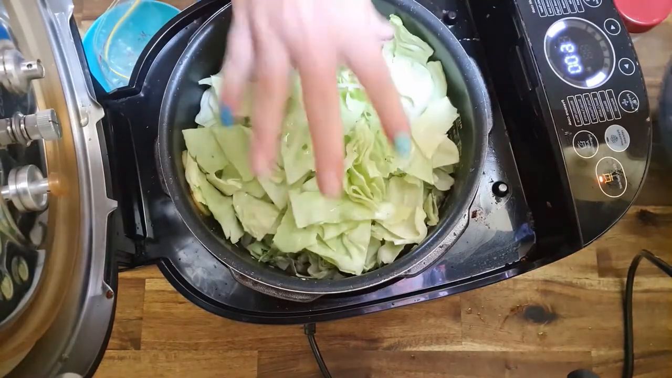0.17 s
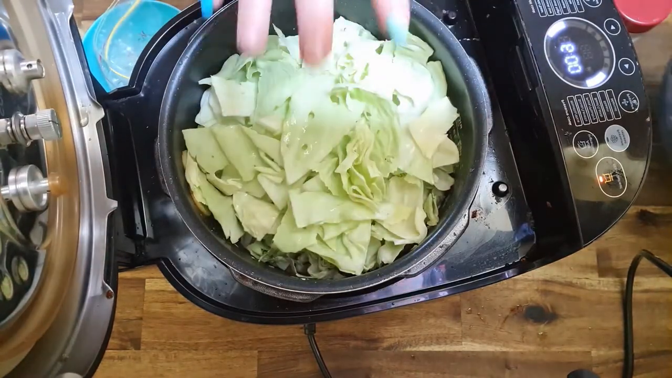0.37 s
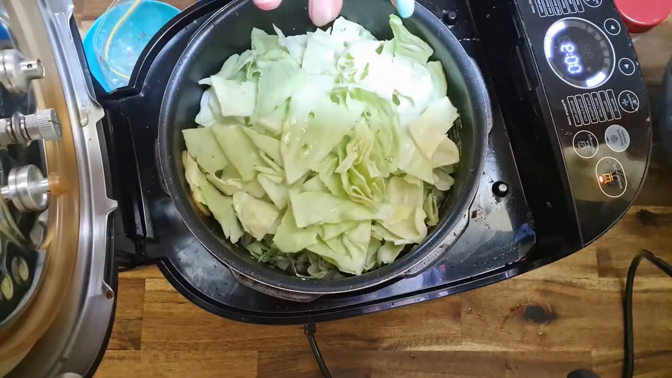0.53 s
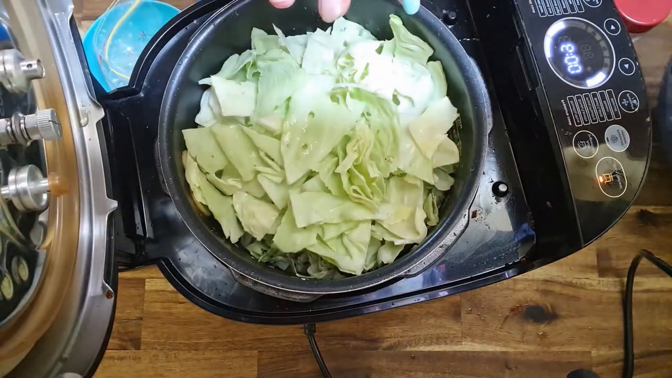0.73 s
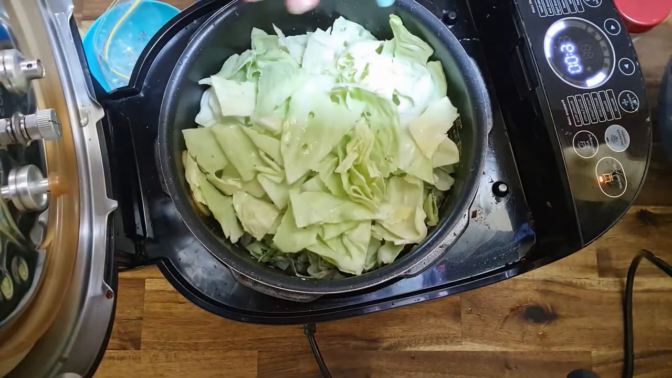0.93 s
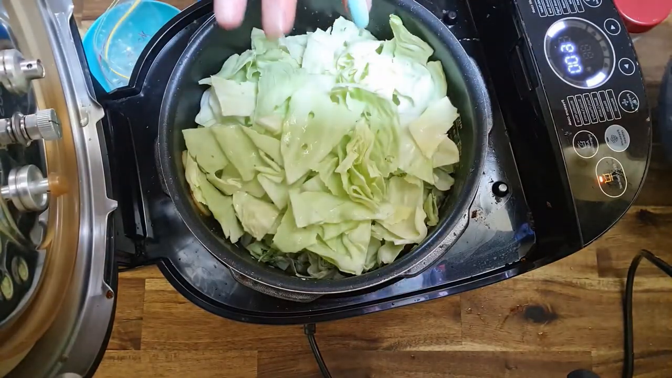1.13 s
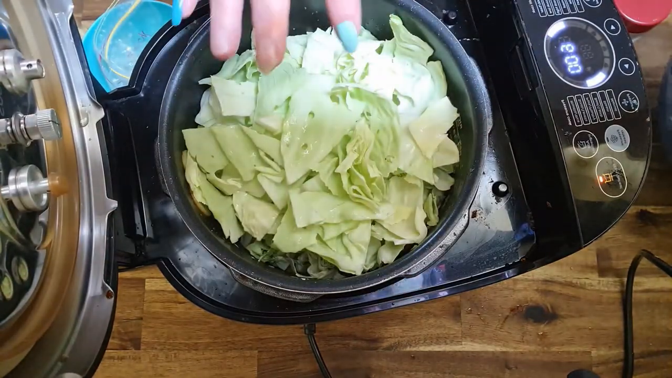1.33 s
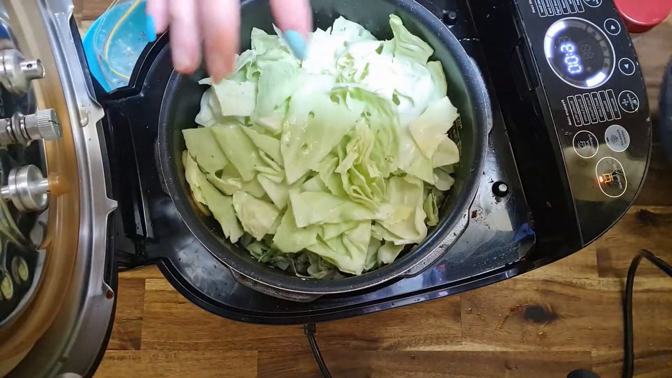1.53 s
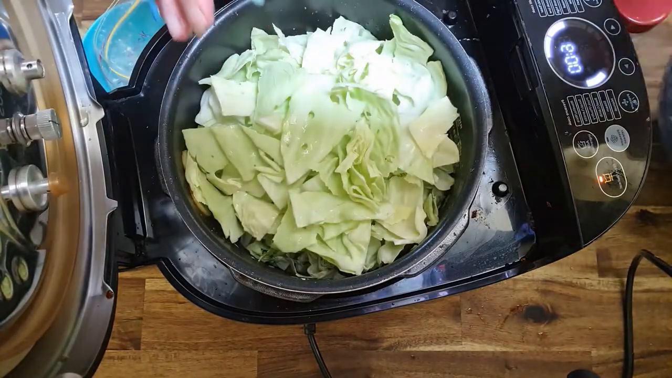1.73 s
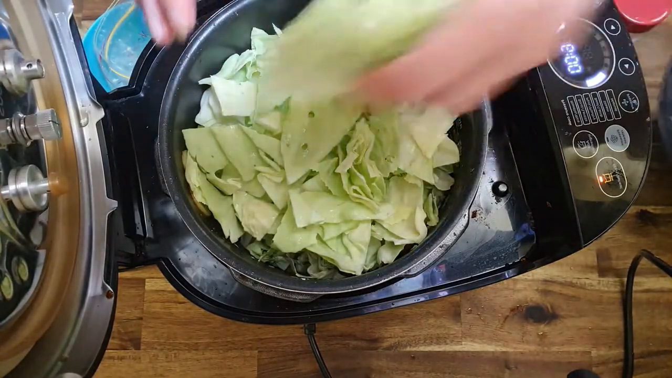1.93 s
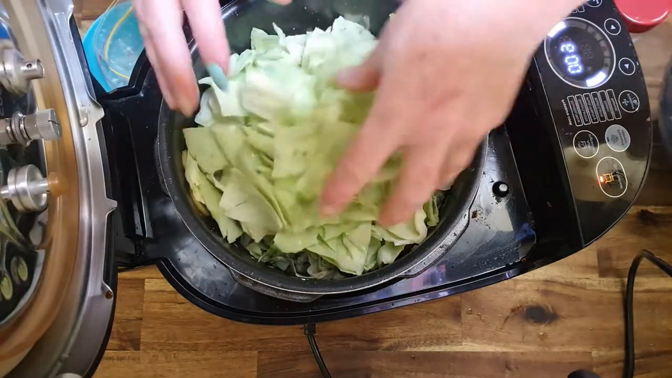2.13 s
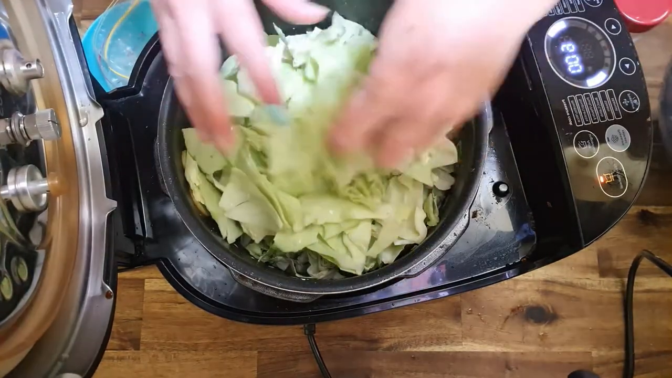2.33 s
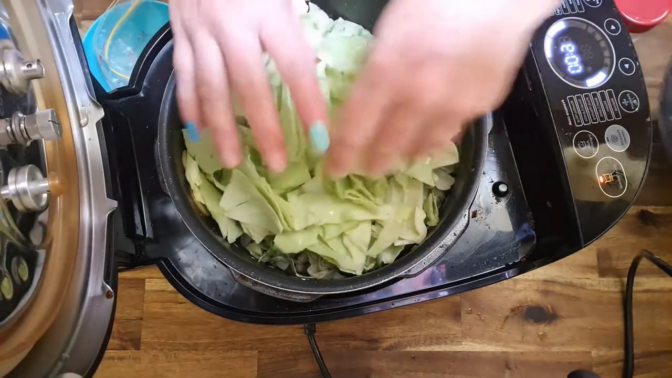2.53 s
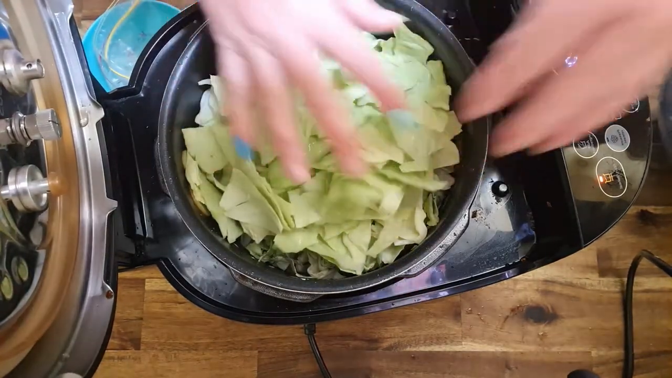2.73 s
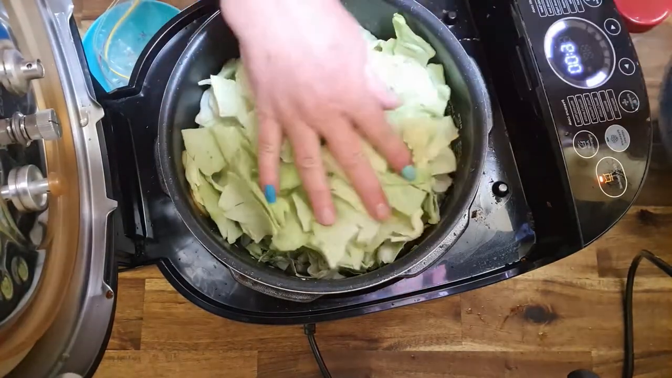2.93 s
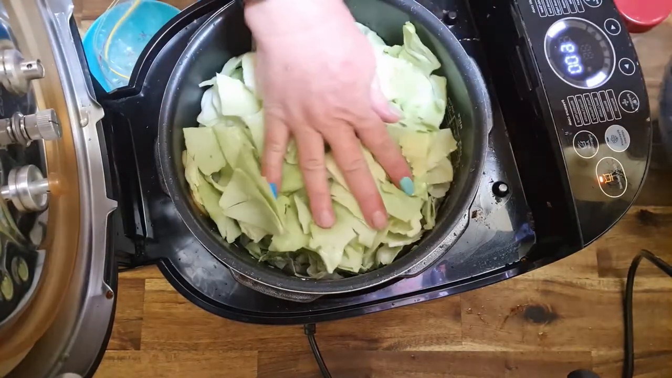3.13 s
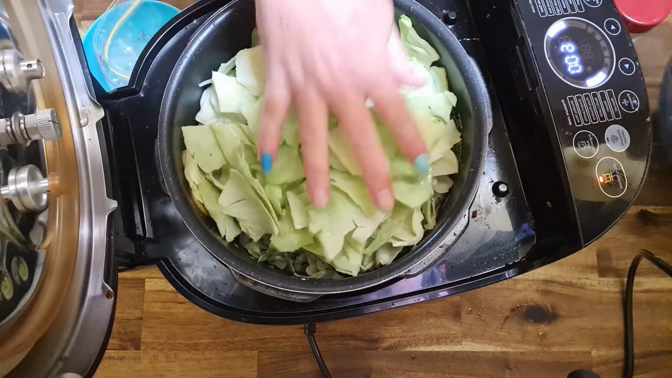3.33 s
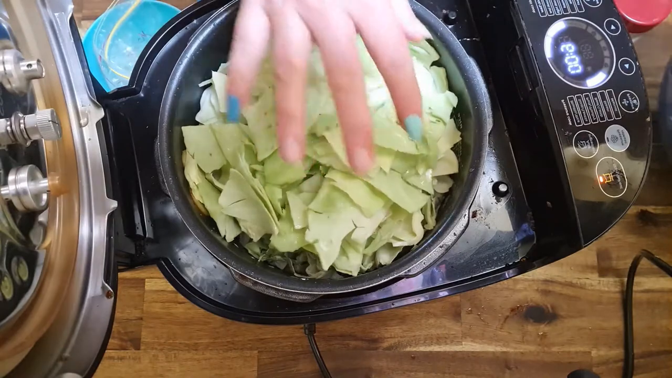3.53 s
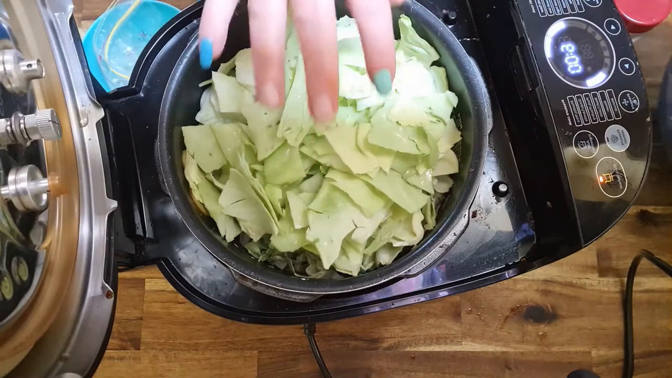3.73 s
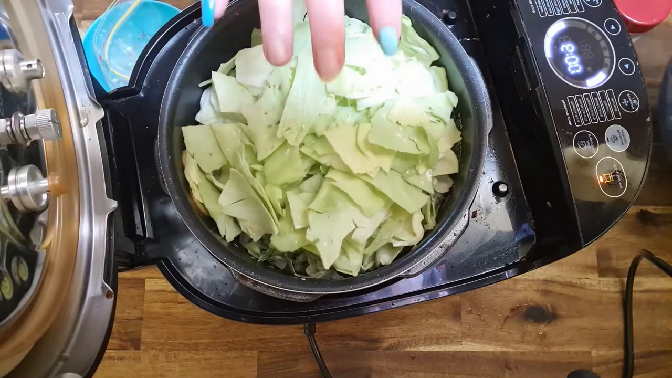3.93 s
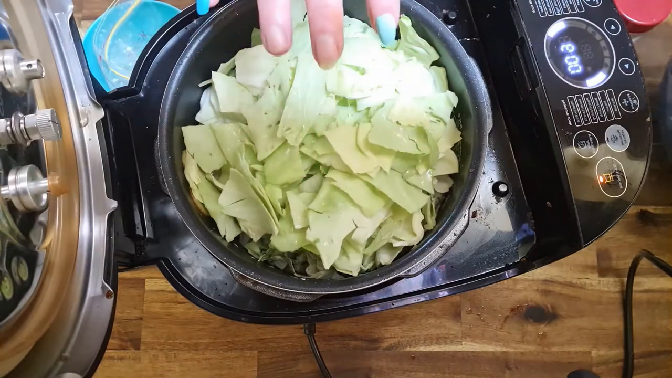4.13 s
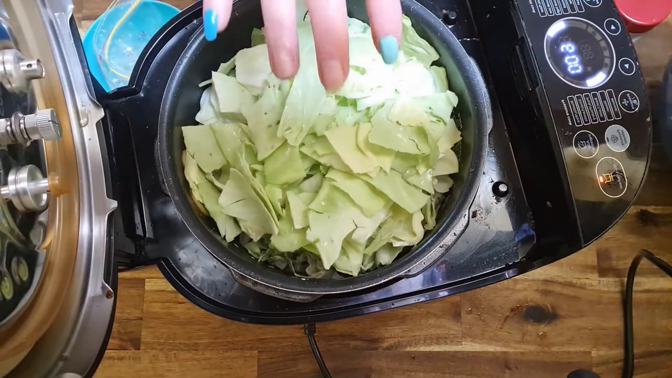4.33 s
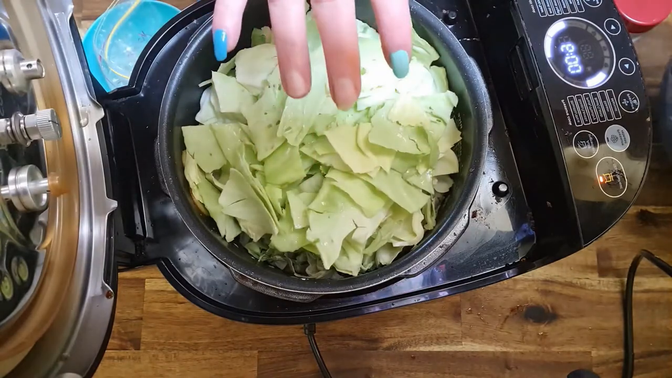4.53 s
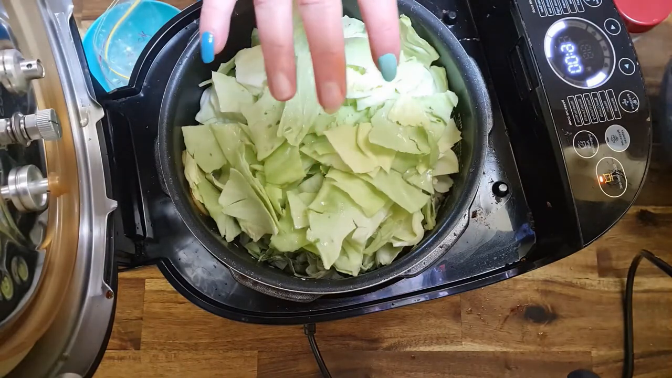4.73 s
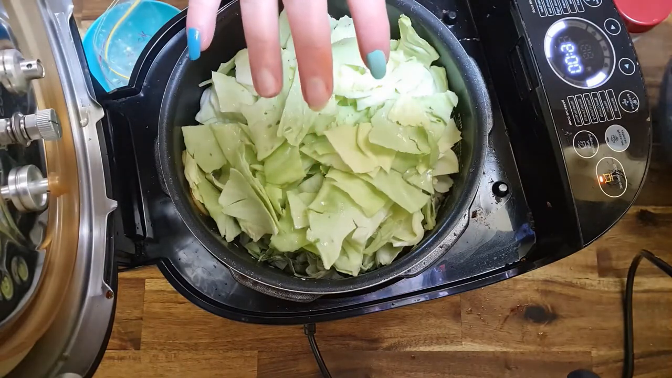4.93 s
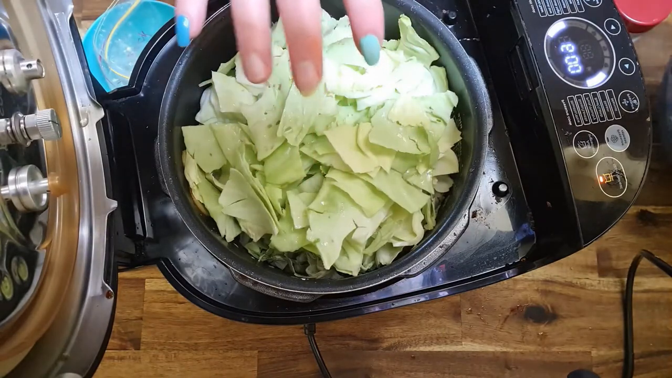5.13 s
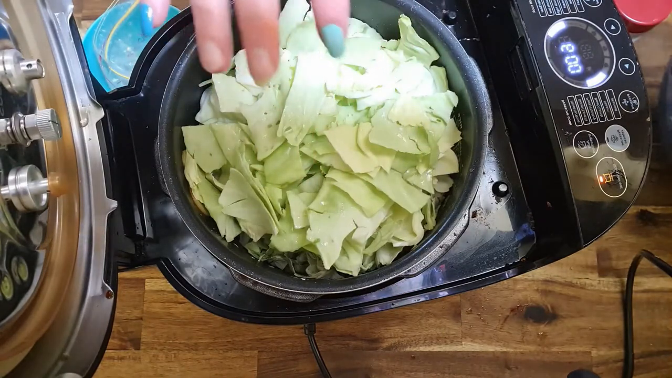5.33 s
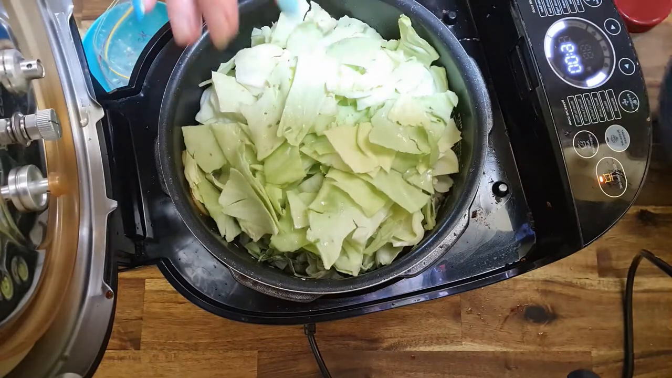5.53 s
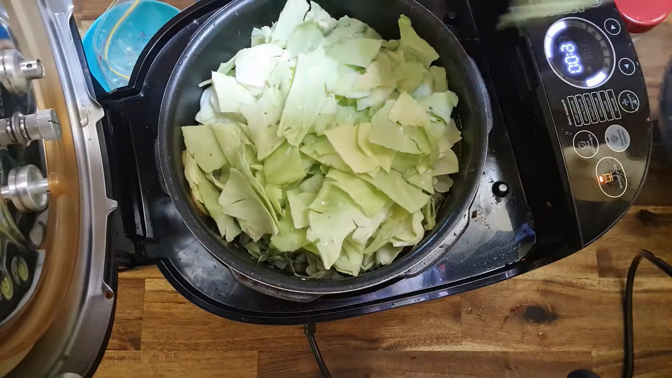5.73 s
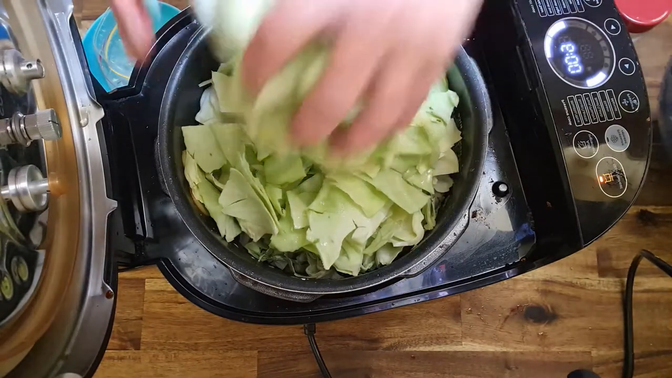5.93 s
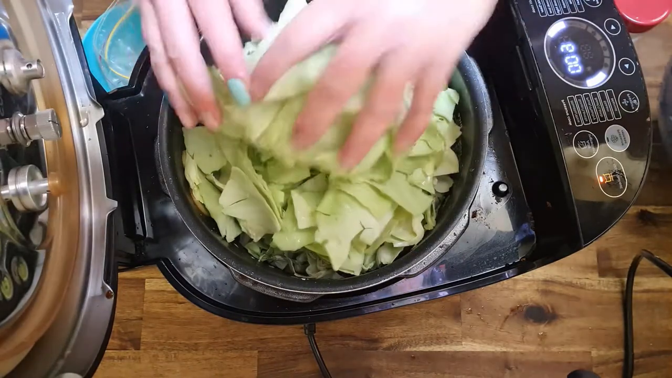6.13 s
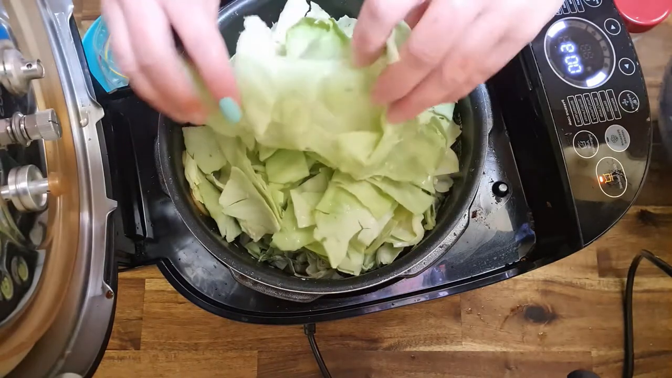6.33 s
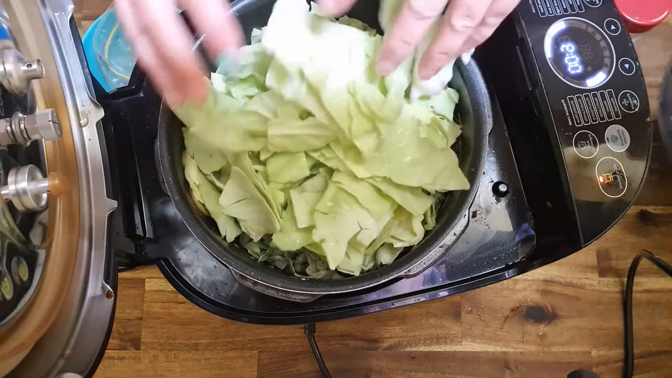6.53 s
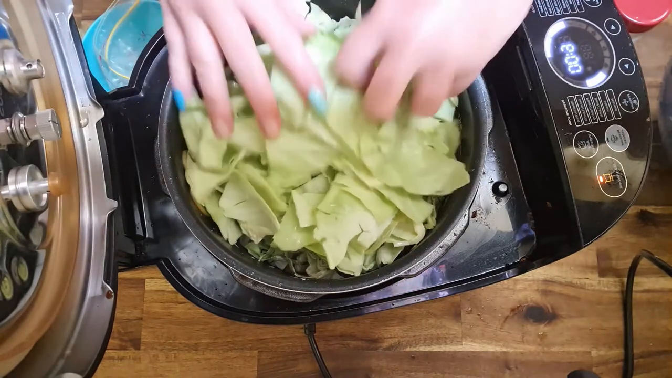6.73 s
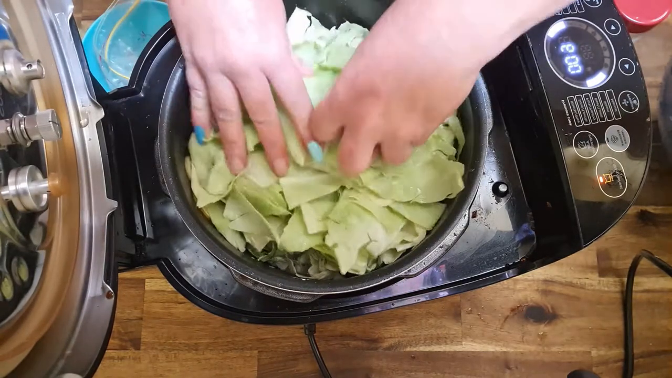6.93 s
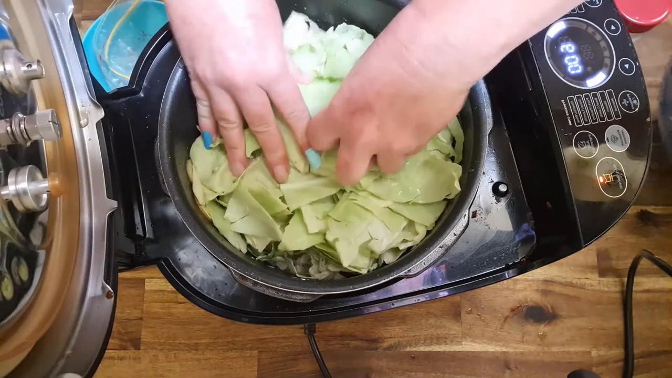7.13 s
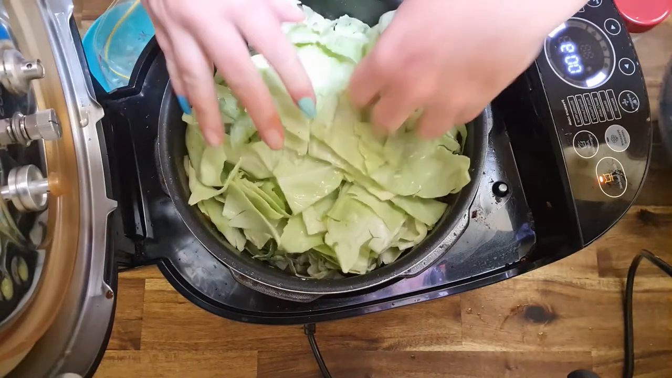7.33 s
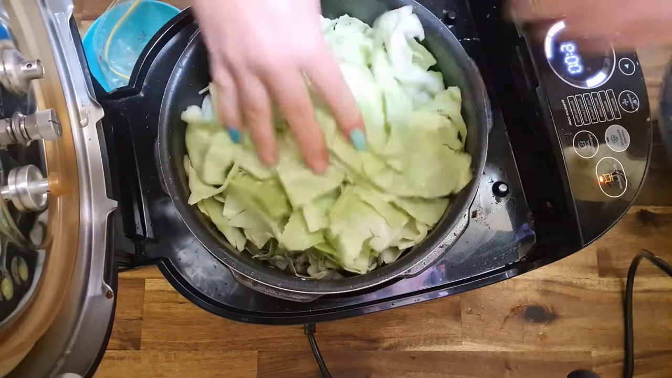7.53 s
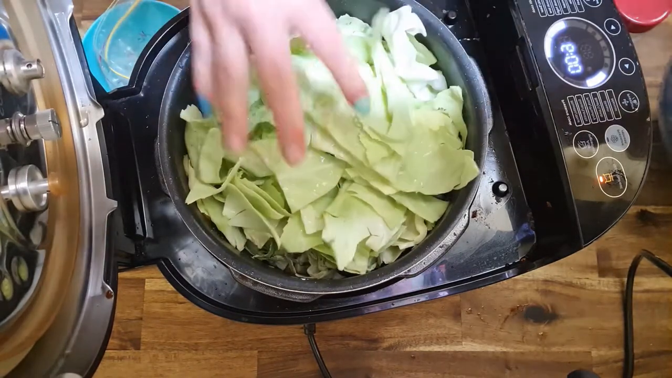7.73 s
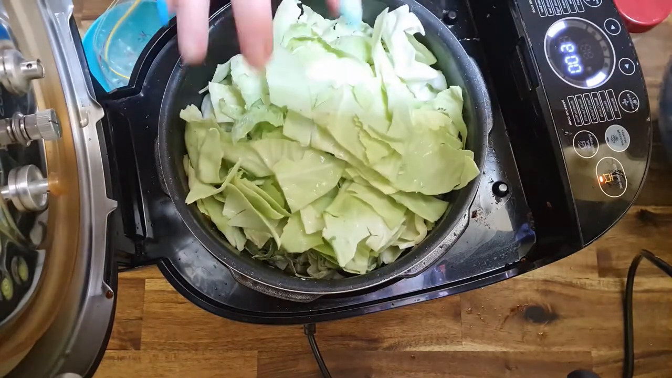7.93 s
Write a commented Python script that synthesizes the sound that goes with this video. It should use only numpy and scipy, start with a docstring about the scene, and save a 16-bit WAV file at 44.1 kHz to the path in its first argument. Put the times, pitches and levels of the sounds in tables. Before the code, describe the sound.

Crunchy raw cabbage leaves crackle, squeak and snap in bursts as hands pack them into a pot, with quiet pauses and low room noise.

```python
"""A small kitchen, microphones close to a cooker pot: two hands spread and press down chopped raw cabbage.
Leaf edges catch and slip in swarms of tiny ringing cracks, and the squeezed pile crunches duller below.
Stiff ribs snap and tear as short bursts; soft thuds are swelling bands of noise; a few leaves squeak.
Leaves also slide on a cutting board, as a hiss of fine cracks. Pot, hollows and kitchen answer with
resonances and a short reverberation, over low room noise and hum made of shaped noise."""
import sys
import numpy as np
from scipy import signal
from scipy.fft import rfft, irfft
from scipy.io import wavfile
from scipy.ndimage import uniform_filter1d

SR = 44100
rng = np.random.default_rng(int(sys.argv[2]) if len(sys.argv) > 2 else 0)


def transcribe(signal):
    """Save signal, clipped to [-1, 1], as a 16-bit WAV file at the path in sys.argv[1]."""
    frames = np.atleast_2d(signal).T
    limited = np.clip(frames, -1, 1)
    pcm = np.round(limited * 32767).astype(np.int16)
    wavfile.write(sys.argv[1], SR, pcm)


N = 351477
TIME = np.arange(N) / SR

# Levels of sources are given ahead of the trims in their functions and of the pot and kitchen.
# strokes of the hands through the pile: peak_s, build_up_s, let_go_s, crackle_level_db,
# crunch_db (relative to crackle), left_over_right_db
HAND_STROKES = [(0.174, 0.033, 0.034, -65, -3, 0), (0.29, 0.071, 0.063, -60, -5.5, -3.5),
                (0.382, 0.051, 0.056, -40, -8, -1.5), (0.622, 0.024, 0.18, -34, -17.5, 0),
                (0.712, 0.14, 0.064, -37.5, -11, -3), (0.824, 0.047, 0.03, -40, -12, -3),
                (0.956, 0.14, 0.041, -54, -8.5, -5), (1.148, 0.011, 0.018, -63.5, -10, -4),
                (1.226, 0.019, 0.02, -64.5, -8, -2), (1.979, 0.049, 0.023, -46.5, -12.5, 1),
                (2.055, 0.042, 0.041, -48, -5.5, 1.5), (2.333, 0.048, 0.024, -38, -11, 2),
                (2.43, 0.158, 0.03, -47, -15, 2.0), (2.473, 0.0084, 0.032, -49.5, -15, 0),
                (2.858, 0.022, 0.15, -49.5, -6, 1.0), (3.001, 0.071, 0.031, -40.5, -8.5, 1.0),
                (3.187, 0.11, 0.034, -51.5, -8.5, 1), (3.331, 0.037, 0.009, -49.5, -7.5, -1.5),
                (3.398, 0.037, 0.2, -50.5, -6.5, -1.5), (3.562, 0.012, 0.13, -45.5, -8.5, -1.5),
                (3.71, 0.019, 0.065, -45, -10.0, -2.5), (3.829, 0.16, 0.064, -43, -8.5, -1),
                (3.999, 0.107, 0.151, -41.5, -10.5, -2.5), (4.101, 0.16, 0.023, -38, -17.5, -1),
                (4.213, 0.023, 0.029, -39.5, -19, -1), (4.41, 0.19, 0.061, -51, -9, -1),
                (4.543, 0.021, 0.026, -50, -8.5, -3.5), (4.947, 0.01, 0.0077, -47, -17, -2),
                (5.954, 0.035, 0.018, -41.5, -19, 1), (5.98, 0.1, 0.071, -47.5, -3, 1.0),
                (6.14, 0.021, 0.084, -59, -6.5, 1.0), (6.278, 0.106, 0.016, -55, -2.5, 0),
                (6.358, 0.014, 0.01, -41.5, -29, 1), (6.38, 0.155, 0.16, -64, 2, 2),
                (6.645, 0.019, 0.11, -44.0, -12, 1.0), (6.782, 0.082, 0.094, -39.5, -6.5, 1),
                (6.976, 0.037, 0.034, -26.0, -7.5, 1.0), (7.17, 0.03, 0.045, -35, -11.5, 1.5),
                (7.242, 0.023, 0.082, -52.5, -6, -0.5), (7.508, 0.013, 0.028, -50, -24, 8),
                (7.545, 0.033, 0.017, -42.5, -7.5, -1), (7.604, 0.0284, 0.062, -60, -1.5, 0.5)]
# a stroke lies FLANK_DB under its peak one build-up before and one let-go after; ROUNDNESS 1 = pointed, 2 = bell
FLANK_DB, ROUNDNESS = -10.0, 1.37
# after each stroke the leaves spring back and creak to rest, from this level under the peak
SETTLE_DB, SETTLE_DB_PER_S = -20, 106.5
# filter of the crackling leaf edges: frequency_hz, gain_db
EDGE_COLOUR = [(600, -47), (1500, -4.5), (2200, -11), (2700, -3.5), (3600, -2), (4600, -2), (6300, -5),
               (8000, -9.5), (10000, -12.5), (13000, -10.5), (16000, -18)]
# filter of the duller cracks deep in the pile: frequency_hz, gain_db
PILE_COLOUR = [(100, -32), (300, 3), (600, -5), (900, -2), (1300, 1.5), (1750, 5), (2150, -2.5),
               (3000, 0.5), (6000, -14.5)]
# the loudest ribs snapping: crack_s, peak_level_db, pitch_hz
RIB_SNAPS = [(0.347, -31.5, 3170), (0.3735, -24, 3170), (0.3846, -24.5, 3670), (0.5142, -36, 3280),
             (0.5606, -30.5, 3800), (0.7015, -16, 1740), (0.8303, -24, 3750), (0.878, -31.5, 3650),
             (0.9564, -30.5, 6260), (1.038, -36.5, 6590), (2.3915, -33.5, 4260), (2.471, -33, 4160),
             (2.9255, -30, 4040), (3.0028, -25, 4060), (3.3209, -31, 3520), (3.4196, -32, 4300),
             (3.5669, -28, 1790), (3.6757, -28.5, 3580), (3.915, -24, 3480), (3.9893, -25.5, 3470),
             (4.2004, -23.5, 7100), (4.36, -34.5, 6000), (4.5504, -36, 5830), (4.9418, -34.5, 6300),
             (5.8421, -39, 5500), (6.0477, -35.5, 2830), (6.3555, -26.5, 2770), (6.4479, -41.5, 3170),
             (6.5444, -46.5, 3100), (6.6489, -30, 6100), (6.683, -28, 4700), (6.8055, -22.5, 7160),
             (6.8344, -22.5, 6200), (6.934, -18, 5960), (6.9421, -18.5, 4460), (6.9672, -11.5, 4410),
             (7.3107, -41.5, 4200), (7.5457, -25.5, 3120)]
# filter of the snapping ribs: frequency_hz, gain_db
RIB_COLOUR = [(300, -1.5), (1500, -8), (2100, -3.5), (2800, 4.5), (6000, 2), (9000, -3.5), (15000, -4.5)]
# pushes that reach the pot: centre_s, peak_level_db, pitch_hz, length_s (centre to 1/e of the swell)
POT_PUSHES = [(0.371, -48, 406, 0.012), (0.648, -49, 122, 0.04), (2.053, -58.5, 303, 0.11),
              (2.994, -48.5, 590, 0.028), (3.328, -50, 108, 0.016), (3.618, -56.5, 131, 0.16),
              (4.06, -50.5, 314, 0.022), (4.444, -48.5, 490, 0.0098), (5.698, -52, 275, 0.035),
              (5.72, -53, 70, .039), (5.968, -42, 285, 0.01), (5.991, -45, 88, 0.02),
              (6.964, -55.5, 80, 0.11), (6.99, -42, 295, 0.019), (7.55, -54.5, 480, .016),
              (7.772, -57, 785, 0.0065)]
# waxy leaves squeaking on each other: centre_s, peak_level_db, pitch_hz, length_s (centre to 1/e)
LEAF_SQUEAKS = [(1.725, -69, 2270, 0.0064), (1.95, -54, 6040, 0.0048), (2.2, -68, 3200, 0.011),
                (3.797, -46, 3210, 0.0057), (3.821, -43, 2820, 0.0057), (4.229, -52, 3470, 0.0056),
                (6.944, -32.5, 4560, 0.0063), (7.601, -55, 2670, 0.0062)]
# leaves pushed across the cutting board: fastest_s, length_s (centre to 1/e), level_db
BOARD_SLIDES = [(5.38, 0.086, -74.5), (5.73, 0.073, -49.5)]
# filter of the hiss on the board: frequency_hz, gain_db
SLIDE_COLOUR = [(500, 0), (1800, -8), (3200, -4.5), (4000, -7), (5000, 1.5), (5800, -7.5), (7000, -8),
                (8500, -15), (15000, -13)]
# hollows between the leaves that ring while a hand holds them in shape; the short row at 777 Hz is instead the
# pot's low mode ringing harder during the hardest press: start_s, end_s, pitch_hz, gain_db
LEAF_HOLLOWS = [(0.342, 0.432, 587, 12), (0.638, 0.79, 1800, 4), (2.277, 2.517, 4740, -7),
                (2.88, 3.194, 1350, 1), (3.396, 4.152, 1750, -2.5), (3.74, 3.87, 3260, 4.5),
                (3.893, 4.255, 3520, -2.5), (5.916, 6.3, 4730, 0), (6.11, 6.3, 2900, 3),
                (6.91, 7.216, 1170, 1), (6.953, 7.03, 777, 5.5), (7.122, 7.276, 4330, -3),
                (7.522, 7.68, 2710, 0.5)]
# resonances of the filled pot: pitch_hz, width_hz, gain_db
POT_RESONANCES = [(299, 5.5, 6), (448, 44, 4.5), (771, 26, 2.5), (1180, 6.9, -20), (1310, 51, 1),
                  (1740, 12, -9), (2565, 22, -2.5), (4240, 21, -10), (5920, 45, -6)]
# kitchen reverberation: frequency_hz, t60_s
KITCHEN_DECAY = [(300, 0.44), (1300, 0.16), (3500, 0.15), (9000, 0.084), (15000, 0.29)]
# spectrum of the room noise: frequency_hz, relative_level_db
AIR_SPECTRUM = [(15, -31.5), (25, -21), (86, -3.5), (227, -10), (305, -3), (378, -14), (410, -9.5),
                (537, -9), (614, -21), (762, -15), (1140, -23.5), (1710, -20.5), (2060, -30.5), (4870, -34),
                (15500, -42.5)]
AIR_DB = -60.5  # overall room noise, rms
# likeness of the background in both ears: frequency_hz, correlation (0-1)
EAR_LIKENESS = [(60, 0.91), (200, 0.93), (450, 0.74), (1000, 0.13), (3000, 0)]
# hum and resonances of a running appliance: pitch_hz, width_hz (centre to half amplitude), level_db (rms)
APPLIANCE_HUM = [(48, 4.2, -70), (97.4, 2.4, -71.5), (152.3, 1.7, -73), (296.5, 27, -80.5),
                 (418.3, 13, -69), (784, 26, -84), (1280, 64, -81), (1757, 18, -80.5)]
BAND_LIMIT_HZ = 15900


def handling():
    """Each stroke builds up, lets go and settles; gives crackle and crunch strength and left-right ratio."""
    edge_power, pile_power, weighted_side = np.zeros((3, N)) + 1e-14
    for s, build, let_go, db, crunch_db, side_db in HAND_STROKES:
        since = TIME - s
        flank = np.where(since < 0, build, let_go)
        press = amp(FLANK_DB * abs(since / flank) ** ROUNDNESS)
        settle = amp(SETTLE_DB - SETTLE_DB_PER_S * abs(since)) * (since > 0)
        power = amp(db) ** 2 * (press ** 2 + settle ** 2)
        edge_power += power
        pile_power += power * amp(crunch_db) ** 2
        weighted_side += power * side_db
    # where strokes overlap, the side is their mean weighted by power, so the stronger one counts most
    return np.sqrt(edge_power), np.sqrt(pile_power), amp(weighted_side / edge_power)


def rustle(edge, pile, side, edge_db=-3, pile_db=-1.5, cracks_per_s=2600, rate_growth=0.6):
    """Harder strokes set off more and louder cracks; squeezed leaves deep in the pile sound duller."""
    per_s = cracks_per_s * (unit(edge) + 0.081) ** rate_growth
    edges = swarm(per_s, scatter_db=2.5, clump_db=2.5, low_hz=2170, high_hz=12900)
    depths = swarm(per_s, scatter_db=2, clump_db=0.5, low_hz=486, high_hz=2440)
    crackle = amp(edge_db) * edge * unit(colour(edges, EDGE_COLOUR))
    crunch = amp(pile_db) * pile * unit(colour(depths, PILE_COLOUR))
    return (crackle + crunch) * np.sqrt([side, 1 / side])


def swarm(per_s, scatter_db, clump_db, low_hz, high_hz, turn_db=8, count=24):
    """Clumps of tiny cracks of uneven size at a steady mean level; a few leaves at a time take the lead."""
    leaf = rng.integers(0, count, N)
    leads = np.array([wander(30) for _ in range(count)])
    lead = leads[leaf, np.arange(N)]
    scatter = np.minimum(rng.exponential(1, N), 4)
    sizes = amp(scatter_db * scatter + clump_db * wander(160) + turn_db * lead)
    cracks = sizes * rng.choice([-1, 1], N) * (rng.random(N) < per_s / SR)
    # the hand feeds in energy evenly
    cracks /= np.sqrt(abs(uniform_filter1d(cracks ** 2, size=1300)) + 1e-6)
    out = np.zeros((2, N))
    for k, hz in enumerate(np.geomspace(low_hz, high_hz, count)):
        own_cracks = (cracks * (leaf == k))[None]
        out += signal.oaconvolve(own_cracks, spot(hz), axes=1)[:, :N]
    return out


def spot(hz, sharpness=5.6, dry_click=0.28, spread_s=0.000601, wall_db=6.5, wall_s=0.01, size=1200):
    """One crack at one place: a leaf flicks, and the pot wall scatters it unequally to the two ears."""
    t = np.arange(size) / SR
    paths = rng.standard_normal((2, size)) * (rng.random((2, size)) < 0.2) * np.exp(-t / wall_s)
    paths *= amp(wall_db) / np.linalg.norm(paths, axis=1, keepdims=True)
    paths += np.sinc((t - spread_s * rng.random((2, 1))) * SR)  # direct click, own delay at each ear
    flick = ring(paths, hz, hz / sharpness) + dry_click * paths
    return flick / np.linalg.norm(flick) * np.sqrt(2)


def snaps(ribs, tear_s=0.0069, warning_s=0.00097, fibre_size=0.4, fibres_per_s=1400, size=1800, count=300):
    """A rib gives way: a few fibres go first, then one sharp crack and a short run of tearing."""
    out = np.zeros((2, N))
    t = (np.arange(size) - count) / SR  # the main crack falls on sample number count
    for s, db, hz in ribs:
        strain = np.exp(-abs(t) / np.where(t < 0, warning_s, tear_s))
        fibres = rng.standard_normal(size) * (rng.random(size) < fibres_per_s / SR)
        tear = fibre_size * fibres * strain
        tear[count] = 1
        rib = spot(hz, sharpness=5, dry_click=0.3, wall_db=1.5, wall_s=0.005)
        crack = colour(signal.fftconvolve(tear[None], rib, axes=1), RIB_COLOUR)
        add(out, s + t[0], amp(db) * crack / abs(crack).max(1).mean())
    return out


def small_ribs(edge, per_s=7, above_db=8.0, scatter_db=0.5, moving_db=-66, low_hz=2800, high_hz=6500, count=160):
    """Thin ribs give way at random while leaves move, in step with the stroke: rows (s, peak dB, pitch Hz)."""
    when, chance, size, pitch = rng.random((count, 4)).T
    s = when * N / SR
    stroke_db = 20 * np.log10(np.interp(s, TIME, edge))
    peak_db = stroke_db + above_db + scatter_db * (2 * size - 1)
    rows = np.transpose([s, peak_db, low_hz * (high_hz / low_hz) ** pitch])
    return rows[(chance < per_s * N / SR / count) & (stroke_db > moving_db)]


def pushes(push_db=-6, apart=0.18):
    """The springy pile passes each push on to the pot as a dull, short rumble."""
    out = np.zeros((2, N))
    t = np.arange(SR // 2) / SR - 1 / 4
    for s, db, hz, length in POT_PUSHES:
        both, side = rng.standard_normal((2, len(t)))
        ears = np.array([both + apart * side, both - apart * side])
        rumble = ring(ring(ears, hz, hz), hz, hz)
        swell = np.exp(-(t / length) ** 2)
        # scaled so that the level holds at the top of the swell
        add(out, s + t[0], amp(db + push_db) * unit(rumble * swell) * np.sqrt(np.mean(swell ** 2)))
    return out


def squeaks(unsteady=0.013, size=4000):
    """Two leaves stick and slip so fast that a brief, unsteady pitch appears."""
    out = np.zeros((2, N))
    t = (np.arange(size) - size / 2) / SR
    for s, db, hz, length in LEAF_SQUEAKS:
        drift = unit(uniform_filter1d(rng.standard_normal(size), size=60))
        turns = np.cumsum(hz * (1 + unsteady * drift)) / SR
        tone = np.sin(2 * np.pi * (turns + rng.random((2, 1)) / 2))  # own phase at each ear
        add(out, s + t[0], amp(db) * np.sqrt(2) * tone * np.exp(-(t / length) ** 2))
    return out


def slide(flatness=2.7):
    """Flat leaves rub along the board in a fine, juddering hiss that swells and stops."""
    speed = sum(amp(db) * np.exp(-abs((TIME - s) / length) ** flatness) for s, length, db in BOARD_SLIDES)
    rub = swarm(7000, scatter_db=2.5, clump_db=2.0, low_hz=2860, high_hz=7450, turn_db=6.5, count=12)
    return speed * unit(colour(rub, SLIDE_COLOUR))


def hollows(x, sharpness=11, fade_s=0.051):
    """Each hollow lends its own pitch to the cracks for as long as it lasts."""
    out = x.copy()
    for start, end, hz, db in LEAF_HOLLOWS:
        held = np.clip(np.minimum(TIME - start, end - TIME) / fade_s + 0.5, 0, 1)
        out += amp(db) * ring(x * held, hz, hz / sharpness)
    return out


def pot(x, through_db=1.0):
    """The filled pot rings briefly with every crack and push."""
    ringing = sum(amp(db) * ring(x, hz, width) for hz, width, db in POT_RESONANCES)
    return amp(through_db) * (x + ringing)


def kitchen(x, wet_db=-10, first_s=0.011):
    """Dense reflections off worktop and walls, each band dying at its own speed."""
    taps = rng.standard_normal((2, SR // 2)) * (TIME[:SR // 2] > first_s)
    hz, t, bands = signal.stft(taps, SR, nperseg=256)
    decay = amp(-60 * t / read(KITCHEN_DECAY, hz)[:, None])
    tail = signal.istft(bands * decay, SR, nperseg=256)[1]
    return x + amp(wet_db) * signal.fftconvolve(x, tail / np.linalg.norm(tail[0]), axes=1)[:, :N]


def room_noise():
    """Low, steady noise of the room with the wavering hum of an appliance, both as shaped noise."""
    hz = np.fft.rfftfreq(N, 1 / SR)
    both, side = rfft(rng.standard_normal((2, N)))
    same = np.clip(read(EAR_LIKENESS, hz), 0, 1)
    ears = np.sqrt((1 + same) / 2) * both + np.array([[1], [-1]]) * np.sqrt((1 - same) / 2) * side
    power = (amp(AIR_DB) * unit(amp(read(AIR_SPECTRUM, hz)))) ** 2
    for f, width, db in APPLIANCE_HUM:
        peak = unit(1 / (1 + ((hz - f) / width) ** 2))
        power += (amp(db) * peak) ** 2
    return irfft(ears * np.sqrt(power), N)


def amp(db):
    """Decibels to gain."""
    return 10 ** (np.asarray(db) / 20)


def unit(x):
    """Scales to rms 1."""
    return x / np.sqrt(np.mean(x ** 2) + 1e-20)


def read(points, hz):
    """Reads a table on a log-frequency axis."""
    f, value = np.transpose(points)
    return np.interp(np.log(hz + 1), np.log(f + 1), value)


def add(mix, s, sound):
    """Mixes a stereo sound in at time s."""
    part = mix[:, max(round(s * SR), 0):][:, :sound.shape[1]]
    part += sound[:, :part.shape[1]]


def colour(x, points, size=2048):
    """Causal filter with the given spectrum, so that clicks keep their sharp front."""
    log_gain = np.log(amp(read(points, abs(np.fft.fftfreq(size, 1 / SR)))))
    # minimum phase: the Hilbert transform of the log gain
    taps = np.fft.ifft(np.exp(np.conj(signal.hilbert(log_gain)))).real
    return signal.oaconvolve(x, taps[None], axes=1)[:, :x.shape[1]]


def ring(x, hz, width):
    """One resonance of gain 1 at its peak, width in Hz."""
    return signal.lfilter(*signal.iirpeak(hz, hz / width, fs=SR), x)


def wander(per_s):
    """Random drift of straight lines between normal draws, per_s draws a second."""
    knots = np.arange(-rng.random() / per_s, N / SR + 1, 1 / per_s)
    return np.interp(TIME, knots, rng.standard_normal(len(knots)))


def scene():
    """Leaves in the pot and on the board, heard in the kitchen."""
    edge, pile, side = handling()
    leaves = rustle(edge, pile, side) + snaps([*RIB_SNAPS, *small_ribs(edge)])
    in_pot = pot(hollows(leaves) + pushes())
    rubs = squeaks() + slide()  # these bypass the pot resonances
    return kitchen(in_pot + rubs) + room_noise()


def record(dry):
    """The recorder's band limit: a steep low-pass."""
    taps = signal.firwin(511, BAND_LIMIT_HZ, window=("kaiser", 8), fs=SR)
    return signal.oaconvolve(dry, taps[None], "same")


dry = scene()
out = record(dry)
transcribe(out)
```